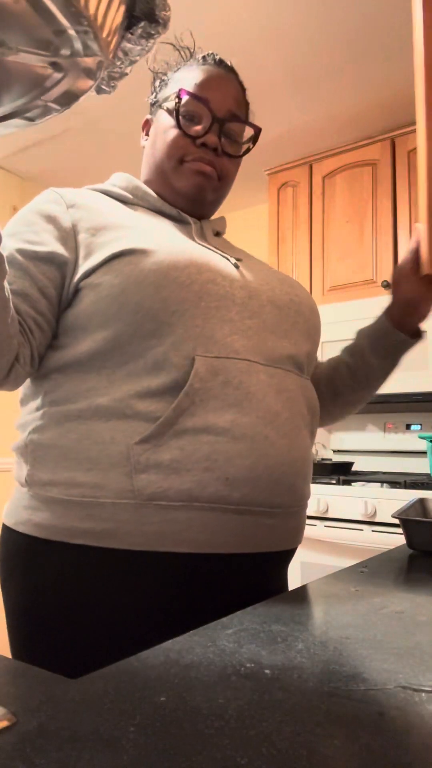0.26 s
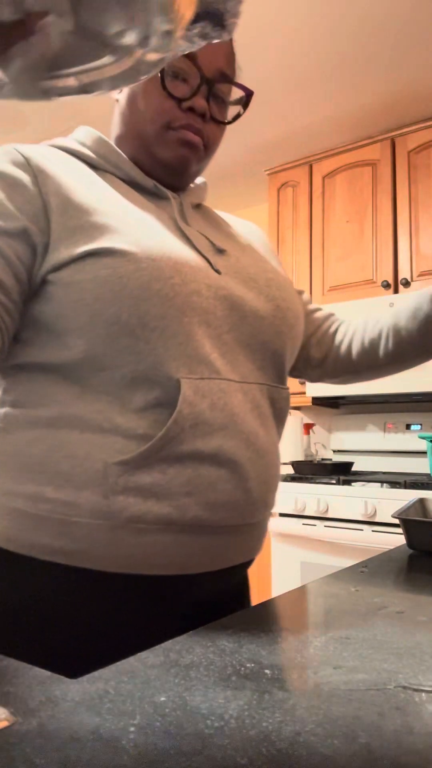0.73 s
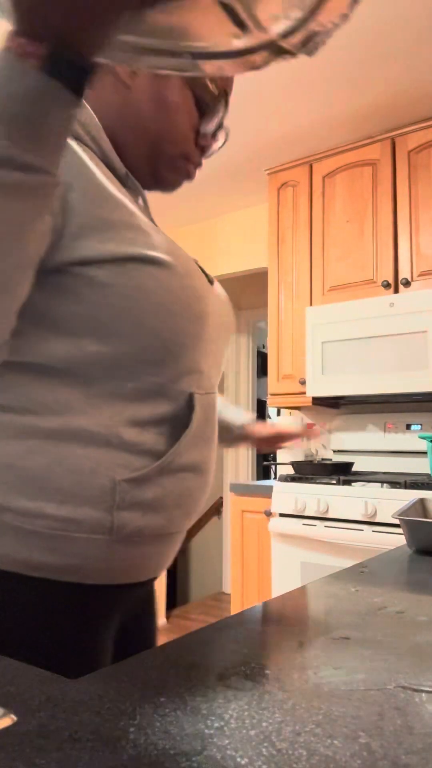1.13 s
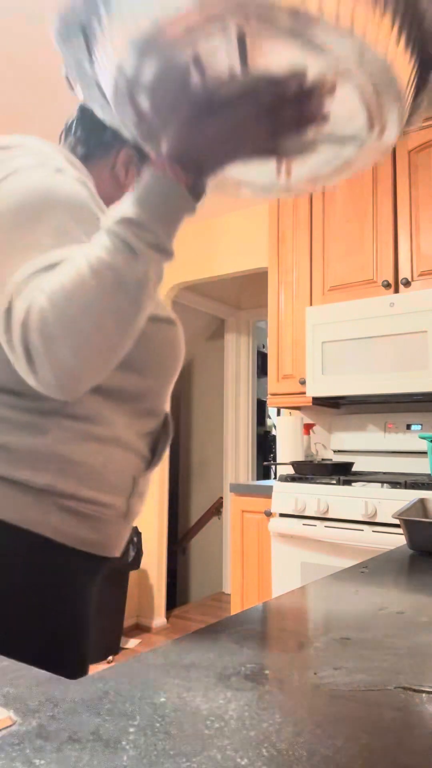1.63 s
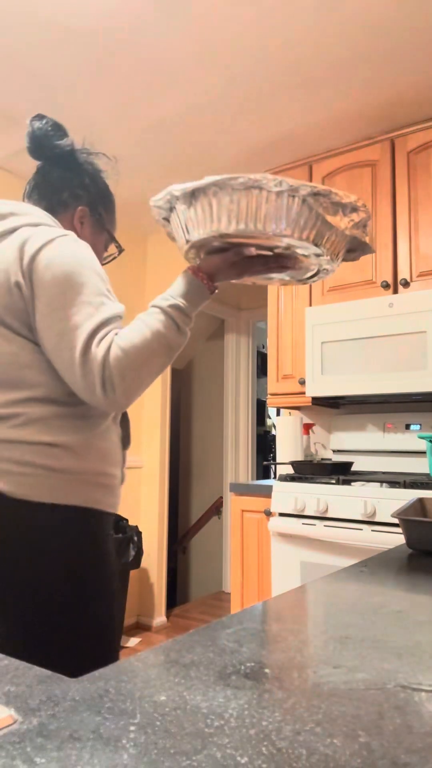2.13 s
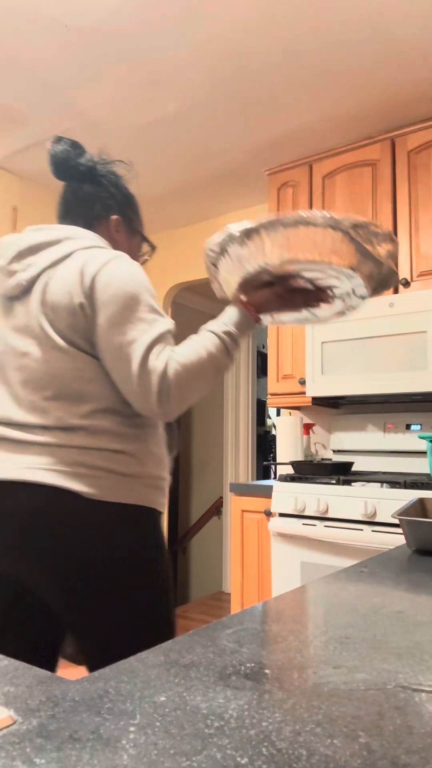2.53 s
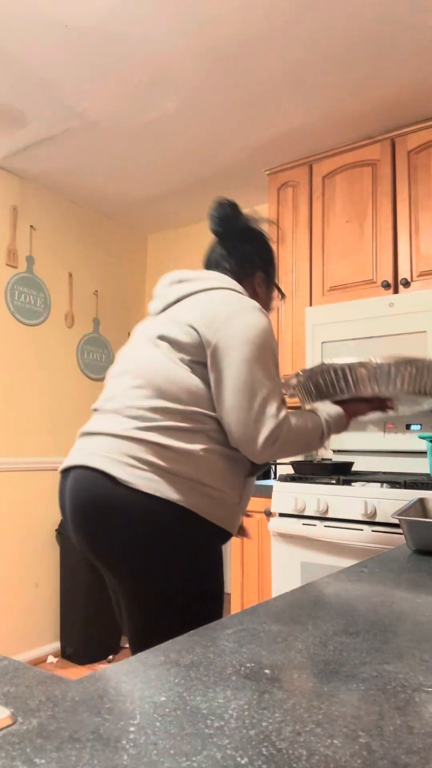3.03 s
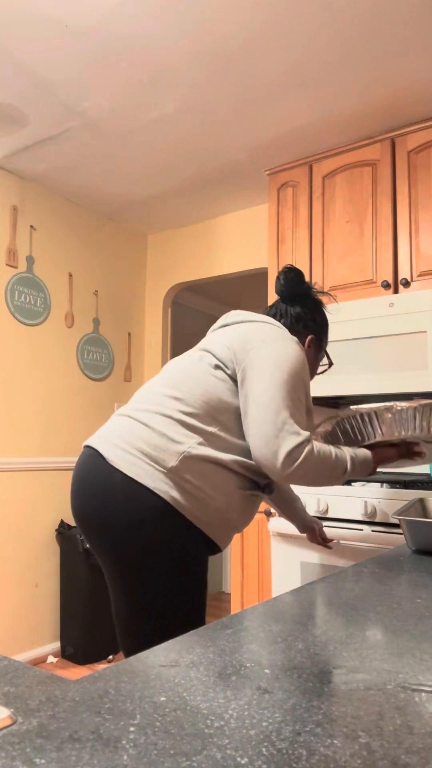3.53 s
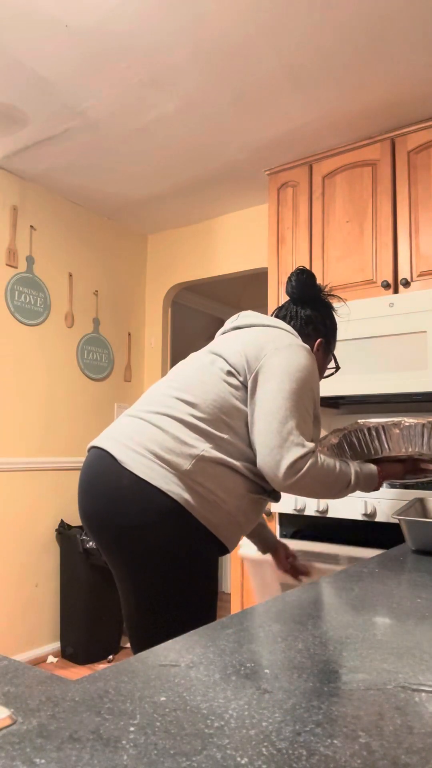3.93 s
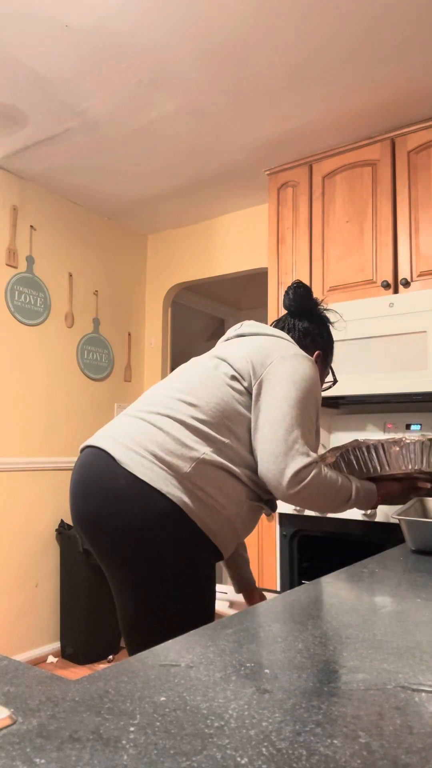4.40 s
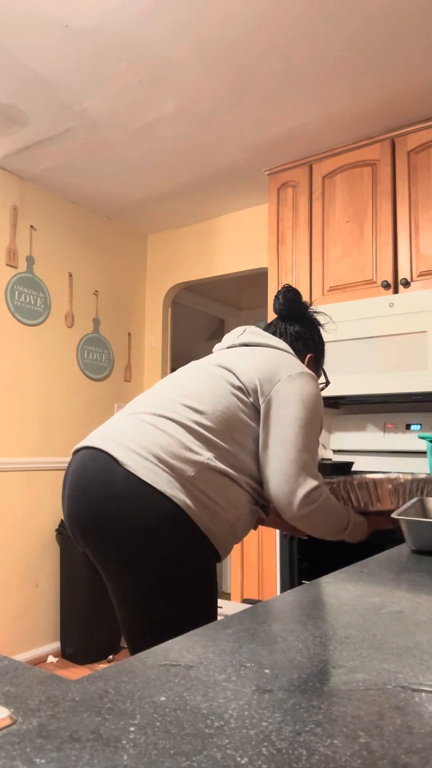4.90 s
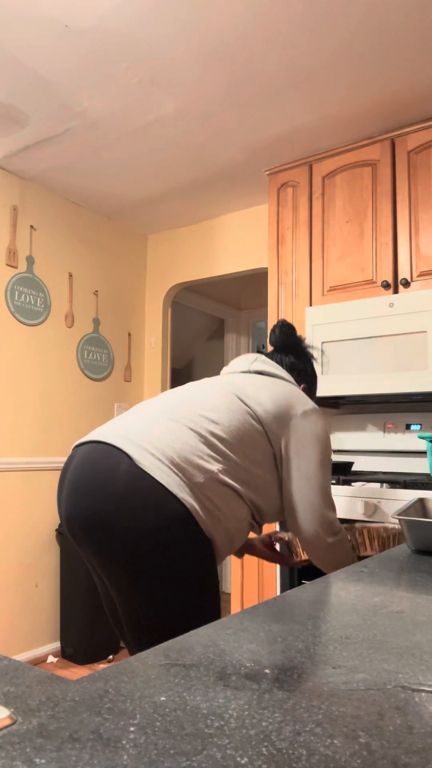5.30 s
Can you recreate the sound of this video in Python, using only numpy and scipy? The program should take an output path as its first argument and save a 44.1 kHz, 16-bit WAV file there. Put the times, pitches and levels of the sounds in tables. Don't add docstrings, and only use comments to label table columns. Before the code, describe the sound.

A small, hard-surfaced home kitchen heard by a stereo phone lying on the counter, with a soft, low refrigerator hum throughout. From 0 to 0.4 s, latch ticks, clicks and a light foil rustle; a thin, broken hinge creak peaks faintly near 0.85 s. At 1.1 s a wooden cupboard door slams very loudly, with a deep boom, sharp crack, rattling loose parts and thin crockery ringing. It bounces hard at 1.5 s, more softly at 1.8 s, and settles with a short rising groan and small knock at 2.1 s. Low, heavy steps thud through the floor from 1.3 to 4.2 s. At 3.0 s the oven door comes off its seal with a hollow, mid-low metallic clunk and brief foil crackle. Quiet rustles and tiny ticks continue until about 4.85 s, when a clink and bright foil crackle begin; the pan scrapes and ticks onto the rack until 5.6 s.

```python
import sys
import numpy as np
from scipy import signal
from scipy.fft import rfft, irfft, next_fast_len
from scipy.io import wavfile
from scipy.ndimage import uniform_filter1d

SR = 44100
rng = np.random.default_rng(int(sys.argv[2]) if len(sys.argv) > 2 else 0)


def how_loud(loudness_db):
    steps = np.asarray(loudness_db, float) / 20
    return 10 ** steps


def digitize_waveform(pressure):
    field = np.atleast_2d(pressure).T
    bounded = np.clip(field, -1, 1)
    quanta = np.round(bounded * 32767).astype(np.int16)
    wavfile.write(sys.argv[1], SR, quanta)


N = 244755


def colour(x, points):
    hz, db = np.transpose(points)
    size = next_fast_len(len(x))
    bins_hz = np.arange(size // 2 + 1) * SR / size
    gain = how_loud(np.interp(np.log(bins_hz + 1), np.log(hz), db))
    return irfft(rfft(x, size) * gain, size)[:len(x)]


def unit(x):
    return x / np.sqrt(np.mean(x ** 2))


def fade(t, t60):
    return np.exp(-np.log(1000) * t / t60)


def add(out, x, s, db):
    i = int(s * SR)
    scaled = x * how_loud(db) / np.abs(x).max()
    out[..., i:i + x.shape[-1]] += scaled[..., :N - i]


def walk(rate):
    k = int(SR / rate)
    held = np.repeat(rng.standard_normal(N // k + 1), k)
    return unit(uniform_filter1d(uniform_filter1d(held, k), k)[:N])


def curve(rows):
    s, *columns = np.transpose(rows)
    return [np.interp(np.arange(N) / SR, s, c, -120, -120) for c in columns]


def share(centres_hz, k):
    grid = np.geomspace(50, SR / 2, num=60)
    peak_at_k = np.arange(len(centres_hz)) == k
    power = np.interp(np.log(grid), np.log(centres_hz), peak_at_k)
    return np.transpose([grid, 10 * np.log10(power + 1e-5)])


def rings(modes, t, rough):
    phase = rng.uniform(0, 2 * np.pi, (len(modes), 2, 1))
    knots = np.arange(0, t[-1] + .03, .025)
    flutter = [np.interp(t, knots, v) for v in rng.standard_normal((len(modes), len(knots)))]
    total = 0
    for (hz, db, t60, span), p, f in zip(modes, phase, flutter):
        wobble = 1 + min(rough * hz / 300, rough) * f
        total = total + how_loud(db) * wobble * np.sin(2 * np.pi * hz * t + p) * fade(span, t60)
    return total


def kitchen():
    # f/Hz, level/dB per Hz
    air_spectrum = [(15, -29), (30, -1.5), (60, -19), (130, -3.5), (195, -12), (250, -6), (300, -18.5),
                    (360, -9), (600, -20), (840, -20.5), (1000, -29.5), (2400, -33.5), (6200, -52.5),
                    (12000, -51.5), (16000, -48.5)]
    # f/Hz, level/dB
    compressor = [(59.2, -46), (123.8, -53.5), (253.0, -56.5), (344.5, -66), (376.8, -66)]
    t = np.arange(N) / SR
    air = np.array([unit(colour(rng.standard_normal(N), air_spectrum)) for _ in range(2)]) * how_loud(-50.5)
    hum = 0
    for hz, db in compressor:
        level = np.sqrt(2) * how_loud(db + 2.64 * walk(11.0))
        hum = hum + level * np.sin(2 * np.pi * hz * (t + 0.0013 * walk(6.4)))
    return air + hum


def ticks():
    # t/s, peak level/dB, f/Hz,
    # t60/s, broad click under the ring/dB
    small_ticks = [(0.03, -41, 5600, 0.14, -28), (0.159, -48, 2030, 0.41, -4),
                   (0.1999, -29, 2100, 0.093, 1), (0.231, -26.5, 1345, 0.091, -39),
                   (0.319, -42, 1830, 0.098, -20), (0.3882, -38.5, 2455, 0.055, -14),
                   (0.7194, -39, 3090, 0.12, -47), (0.9692, -45, 2910, 0.073, -21),
                   (1.086, -36, 1516, 0.2, -8), (1.445, -50, 2280, 0.2, -20),
                   (1.7586, -47, 4140, 0.096, -34), (2.585, -48, 2650, 0.096, -31),
                   (2.6427, -39.5, 2964, 0.15, -43), (2.9297, -50.5, 5190, 0.12, -30),
                   (3.3084, -47, 2420, 0.15, -1), (3.4206, -46, 2500, 0.055, -12),
                   (3.5335, -52, 1510, 0.15, -15), (3.9457, -39.5, 2537, 0.15, -32),
                   (4.544, -49.5, 2500, 0.12, 3), (4.5968, -47, 2470, 0.28, -12),
                   (4.7765, -45.5, 4040, 0.14, -24), (4.8514, -32.5, 3060, 0.12, -8),
                   (5.047, -42, 2710, 0.29, 19), (5.2076, -39, 2420, 0.29, 8),
                   (0.1586, -47, 5430, 0.1, -7), (0.235, -29, 1150, 0.054, -32),
                      (0.387, -48, 1536, 0.17, -31), (0.7206, -42.5, 1330, 0.053, -19),
                      (2.148, -47, 650, 0.1, -7), (2.422, -48, 274, .1, -26), (2.585, -43, 866, 0.068, -18),
                      (2.6393, -49, 1370, 0.1, -25), (2.6394, -45, 2070, 0.11, -25),
                      (3.01, -31.5, 2410, 0.15, -24), (3.3037, -56, 5500, 0.17, -8),
                      (3.5236, -48, 2620, 0.12, -18), (3.7375, -55, 6200, 0.2, -18),
                      (3.9424, -43, 2070, 0.089, -27), (3.9425, -48, 1390, 0.091, -26),
                      (3.944, -46, 3080, 0.12, -30), (4.5984, -50, 5340, 0.22, -11),
                      (4.838, -39.5, 2990, 0.13, 6), (4.852, -32.5, 912, 0.18, -11)]
    out, t = np.zeros((2, N)), np.arange(int(.3 * SR)) / SR
    for s, db, hz, t60, click_db in small_ticks:
        band = [(hz / 5, click_db - 28.0), (hz / 1.16, click_db), (hz, 0),
                (hz * 1.28, click_db), (hz * 4, click_db - 15.0)]
        noise = np.array([unit(colour(rng.standard_normal(len(t)), band)) for _ in range(2)])
        tail = noise * (fade(t, t60) + 0.3 * fade(t, 0.21))
        struck = tail + rings([(hz, 0, 1.43 * t60, t)], t, 0.18)
        add(out, struck * np.minimum(t / 0.00083, 1), s - .001, db - 3.0)
    return out


def hands():
    # t/s, body level/dB, thin crackle level/dB, swell/s per 20 dB, dying/s per 20 dB
    cupboard_moves = [(0.032, -66, -68, .02, 0.27), (0.18, -68, -66, 0.042, 0.046),
                      (0.196, -51.5, -77, 0.0052, 0.18), (0.42, -75, -92, 0.018, 1),
                      (0.722, -68, -82.5, 0.026, 0.11), (1.053, -52, -47.5, 0.029, 0.034),
                      (1.109, -46.5, -86, 0.083, .01), (1.444, -66, -90, 0.0069, .03),
                      (1.509, -52, -97, 0.012, 0.012), (1.762, -71, -85, .03, 0.061),
                      (1.81, -76, -75, .012, 0.18), (2.076, -69.5, -96, 0.18, 0.09),
                      (2.149, -58, -73, 0.0044, 0.37), (2.235, -58.5, -59.5, 0.27, 0.33),
                      (2.646, -64.5, -78, 0.3, 0.041), (2.774, -55.5, -68, 0.12, 0.13)]
    # t/s, body level/dB, thin crackle level/dB, swell/s per 20 dB, dying/s per 20 dB
    loading_moves = [(3.018, -42, -68.5, 0.015, 0.055), (3.065, -45, -50, 0.036, 0.11),
                     (3.6, -62, -79, 0.54, 0.059), (3.76, -71, -80.5, 0.15, 0.12),
                     (3.96, -69, -90, 0.19, 0.066), (4.06, -65, -81, 0.11, 0.7),
                     (4.35, -67.5, -69, 0.026, 0.083), (4.55, -81, -68, .015, .08),
                     (4.6, -68, -72, .01, 0.17), (4.781, -62, -69, 0.029, 0.024),
                     (4.858, -44, -51, 0.025, 0.26), (5.055, -53.5, -61, .015, 0.16),
                     (5.222, -51.5, -56.5, 0.067, 0.17), (5.335, -76, -60.5, 0.023, 0.3),
                     (5.41, -79, -63, .01, .1), (5.44, -57.5, -74, .05, 0.19), (5.54, -57, -60, 0.097, .2)]
    t = np.arange(0, N / SR, .001)
    s, body_db, crackle_db, swell, dying = np.transpose(cupboard_moves + loading_moves)[..., None]

    def moves(db, dies):
        return how_loud(db - 20 * np.maximum((s - t) / swell, (t - s) / dies)).sum(axis=0)

    held = np.clip(np.minimum(t - 0.05, 4.2 - t) / 0.11, 0, 1)
    body = moves(body_db, dying) + held * how_loud(-74.5)
    crackle = moves(crackle_db, 0.73 * dying) + held * how_loud(-80.5)
    return [np.interp(np.arange(N) / SR, t, g) for g in (body, crackle)]


def crinkle(points, per_s, spread_db, smear):
    strength = how_loud(2 * spread_db * np.minimum(rng.exponential(size=N), 3.0))
    clicks = (rng.random(N) < per_s / SR) * strength
    decay = fade(np.arange(int(smear * SR)) / SR, smear / 2)
    puffs = np.sqrt(np.abs(signal.fftconvolve(clicks, decay)[:N]))
    return np.array([unit(colour(puffs * rng.standard_normal(N), points)) for _ in range(2)])


def rustle():
    # f/Hz, level/dB per Hz
    foil_body = [(300, -13.5), (600, -8), (900, -14), (1600, -17), (2400, -7), (3300, -14), (5300, -15),
                 (7000, -20), (9000, -46.5), (12000, -70)]
    # f/Hz, level/dB per Hz
    foil_crackle = [(5000, -38), (7500, 9.5), (10000, 1.5), (12500, 6), (15000, -1.5), (17000, 8)]
    sheets_hz = [600, 1100, 1800, 2600, 3800, 5500, 8000]
    patches = sum(crinkle(share(sheets_hz, k), 500, 2.4, .07) for k in range(len(sheets_hz)))
    body = unit(np.array([colour(v, foil_body) for v in patches]))
    top = crinkle(foil_crackle, 600, 1.9, .04)
    grip, crackle = hands()
    return how_loud(0.5) * grip * body + how_loud(3.5) * crackle * top


def knocks():
    # t/s, peak level/dB,
    # f/Hz, t60/s, rise/s
    short_knocks = [(1.0842, -37, 2244, 0.15, .001), (1.0853, -46, 1340, 0.12, .001),
                    (1.089, -28.5, 517, 0.2, 0.0052), (1.119, -14, 1534, 0.08, 0.0028),
                    (1.119, -11.5, 2175, 0.058, 0.0031), (1.121, -23, 3740, 0.047, .003),
                    (1.121, -18.5, 830, 0.12, 0.0034), (1.1205, -22, 4800, 0.056, 0.0016),
                    (1.142, -21, 2270, 0.04, 0.0018), (1.15, -26, 885, 0.41, .004),
                    (1.161, -18, 1956, 0.038, .001), (1.172, -27, 2450, 0.067, .001),
                    (1.184, -28.5, 1558, 0.11, 0.0015), (1.213, -31.5, 2530, 0.18, 0.0031),
                    (1.444, -45, 2275, 0.14, 0.00087), (1.446, -55, 3120, 0.055, .001),
                    (1.449, -43.5, 954, 0.12, 0.00089), (1.5164, -26.5, 1916, 0.09, 0.0013),
                    (1.5156, -23.5, 2330, 0.1, .001), (1.5174, -28.5, 4050, 0.056, 0.00095),
                    (1.526, -27, 3480, 0.074, 0.0017), (1.551, -28, 2600, 0.065, 0.00081),
                    (1.566, -29, 2200, 0.22, .003), (1.577, -35.5, 1876, 0.26, 0.0022),
                    (3.007, -25, 792, .08, 0.0026), (3.0096, -35, 2385, .07, .001),
                    (3.028, -18.5, 474, 0.069, 0.0056), (3.027, -33, 2354, 0.054, .002),
                    (3.044, -29, 640, 0.15, .002), (3.062, -37, 504, 0.059, 0.0024),
                    (0.033, -55, 5630, .12, .003), (4.86, -39, 2400, .15, 0.0043),
                    (4.94, -44, 2500, 0.11, .002), (5.056, -48, 5400, 0.12, .003),
                    (5.075, -51, 2180, 0.069, .003),
                    (1.826, -35.5, 2310, .06, 0.0023), (1.826, -44.5, 1484, .07, .002),
                     (1.828, -49, 4830, 0.035, .001), (1.846, -38, 2310, 0.055, .002),
                     (1.847, -41, 1540, 0.064, 0.0017), (1.862, -39, 2440, 0.07, .002),
                     (1.88, -41, 2340, .1, .002), (1.905, -50.5, 1900, 0.41, 0.0074),
                     (1.91, -55, 3480, 0.32, .008), (2.146, -44, 2910, 0.065, .002),
                     (2.146, -59, 4600, .05, 0.0018), (2.2, -44, 2800, 0.18, 0.0097),
                     (2.143, -32.5, 724, 0.18, 0.0014), (3.007, -19, 434, 0.13, 0.0018),
                     (3.018, -28, 465, 0.091, .002), (3.042, -21.5, 477, 0.071, .003),
                     (1.5156, -37, 3000, 0.054, .001), (1.516, -36, 5310, 0.061, .001),
                     (1.124, -14.5, 2610, 0.021, 0.0015)]
    out, t = np.zeros((2, N)), np.arange(int(.2 * SR)) / SR
    rows = short_knocks
    ports = np.array([[1], [.6]])
    for (s, db, hz, t60, rise), spread in zip(rows, rng.standard_normal((len(rows), 6))):
        neighbours = [(hz * np.exp(.13 * v), -7.0, 0.85 * t60, t) for v in spread]
        cluster = [(hz, 0, t60, t)] + neighbours
        onset = 1 - np.exp(-(t / rise) ** 2)
        add(out, rings(cluster, t, 0.21) * onset * ports, s - .001, db)
    return out


def squeak(rows, slips_hz, rough):
    hz, db = curve(rows)
    turn = np.exp(2j * np.pi * np.cumsum(hz) / SR)
    parts = [(turn * (1 + rough * (walk(slips_hz) + 1j * walk(slips_hz)))).real for _ in range(2)]
    return how_loud(db) * np.array(parts)


def hinge():
    # t/s, f/Hz, level/dB
    creak_path = [(0.34, 2500, -75), (0.52, 2500, -73), (0.565, 2500, -68), (0.68, 2460, -72),
                  (0.74, 2450, -74), (0.85, 2420, -57), (0.97, 2405, -77)]
    # t/s, f/Hz, level/dB
    groan_path = [(1.96, 400, -72), (2.05, 525, -52), (2.13, 538, -46)]
    breaks = how_loud(-4.5 + 2.1 * walk(34.8))
    return breaks * how_loud(5.0) * squeak(creak_path, 230, 1.24) + squeak(groan_path, 38, 0.64)


def blow(t, modes, contact, free):
    damped = 0.29 * np.minimum(t, free) + 0.99 * np.maximum(t - free, 0)
    choke = 1 - 0.52 / (1 + np.exp((free - t) / 0.0016))
    panel = rings([(*mode, damped if mode[0] < 300 else t) for mode in modes], t, 0.56)
    return panel * choke * (1 - np.exp(-t / contact))


def reverberant(t, points, lasts):
    # f/Hz, t60/s
    room_decay = [(150, 0.74), (500, 0.44), (1500, 0.29), (4000, 0.26), (12000, 0.36)]
    shaped = [colour(rng.standard_normal(len(t)), points) for _ in range(2)]
    hz, t60 = np.transpose(room_decay)
    age = 0.16 * np.minimum(t, lasts) + np.maximum(t - lasts, 0)
    return sum(np.array([colour(v, share(hz, k)) for v in shaped]) * fade(age, t60[k]) for k in range(len(hz)))


def clatter(t, tilt_db, lasts, top_db):
    # f/Hz, level/dB per Hz
    rattle_spectrum = [(90, 0.5), (160, -4), (300, -9), (500, -10.5), (870, -15), (1150, -19), (1550, -15),
                       (2300, -15.5), (3200, -20.5), (5000, -27), (7000, -39), (10500, -45), (16000, -48)]
    tilted = [(hz, db + tilt_db * np.log2(hz / 2000) + (top_db if hz > 9000 else 0))
              for hz, db in rattle_spectrum]
    crack = 1 + 0.18 * np.exp(-((t - .008) / 0.0022) ** 2)
    onset = 1 - np.exp(-(t / 0.0048) ** 2)
    return reverberant(t, tilted, lasts) * how_loud(1.83 * walk(100)[:len(t)]) * crack * onset


def crockery(t):
    # f/Hz, level/dB, t60/s
    cup_modes = [(1270, -4.5, .75), (1530, -3, .3), (1625, -5, .6), (1880, 0, .6), (1960, -5, .6),
                 (2350, -2, .45), (2560, -5, .65), (3150, -9, .35), (3500, -10, .5), (4370, -11, .55),
                 (4760, -12, .5), (5330, -11, .45), (6100, -15, .35)]
    shaken = [(hz, db + rng.standard_normal(), t60, t) for hz, db, t60 in cup_modes]
    twins = [(1.012 * hz, db - 4.0, 1.1 * t60, span) for hz, db, t60, span in shaken]
    return rings(shaken + twins, t, 0.6) * np.minimum(t / 0.0018, 1)


def doors():
    # t/s, peak level/dB, contact/s, free ring/s
    panel_blows = [
        (1.115, -0.5, 0.0059, 0.096),
        (1.508, -5, 0.024, 0.049),
        (1.816, -14, 0.014, 0.11),
        (2.139, -33.5, 0.00106, 0.031),
        (3.005, -15, 0.024, 0.048),
    ]
    # f/Hz, level/dB, t60/s
    slam_modes = [(53.8, -5.5, 0.74), (126.3, 2, 0.27), (172.8, -15.5, 0.51), (205.3, -13.5, 0.46),
                  (239.3, -14.5, 0.25), (310, -17.5, 0.41), (400, -25, 0.74), (454, -17, 0.82),
                  (525, -40, 0.32), (884, -32.5, 0.25), (718, -35, 0.086)]
    # f/Hz, level/dB, t60/s
    bounce_modes = [(53.3, -12.5, 0.29), (91, -2, 0.27), (125, -3.5, 0.25), (175.5, -11.5, 0.53),
                    (152.1, -8, 0.41), (258.8, -12.5, 0.31), (345, -11.5, 0.13), (418, -13.5, 0.26),
                    (524, -19, 0.2), (725, -28.5, 0.62)]
    # f/Hz, level/dB, t60/s
    rebound_modes = [(57, 1, 0.52), (101, -9.5, 0.58), (127.7, -6, 0.49), (150.4, -1, 0.1),
                     (212, -29, 0.18), (250, -39, 0.26), (402, -23.5, 0.35), (690, -35, 0.48)]
    # f/Hz, level/dB, t60/s
    settle_modes = [(233, -10, 0.19), (315, -17, 0.53), (380, -15, 0.84), (490, 7.5, 0.36), (603, -2, 0.33),
                    (715, 0, 0.66), (750, -3.5, 0.31), (860, -4.5, 0.26)]
    # f/Hz, level/dB, t60/s
    oven_modes = [(129.3, -16, 0.4), (162.4, -11.5, 0.15), (236, -12.5, 0.29), (327, -4, 0.24),
                  (395.6, -4, 0.2), (431, 0, 0.2), (480, -4, 0.2), (548.6, -9, 0.16), (630, -8, 0.16),
                  (772, -17, 0.067)]
    # t/s, peak level/dB, tilt/dB per octave, rattle/s, top air/dB
    loose_parts = [(1.1128, -12.5, 1.5, 0.065, 2), (1.513, -12, -1, 0.04, -2), (1.821, -26, -2, 0.047, 5.5),
                   (2.14, -25, -4.5, 0.019, -8), (3.005, -22.5, 0, 0.05, 9)]
    crockery_peaks = [-22.5, -31, -40, -76, -46]
    out, t = np.zeros((2, N)), np.arange(int(.8 * SR)) / SR
    bodies = (slam_modes, bounce_modes, rebound_modes, settle_modes, oven_modes)
    for (s, db, contact, free), modes in zip(panel_blows, bodies):
        add(out, blow(t, modes, contact, free), s, db)
    for (s, db, tilt_db, lasts, top_db), ring_db in zip(loose_parts, crockery_peaks):
        add(out, clatter(t, tilt_db, lasts, top_db), s, db)
        add(out, crockery(t), s, ring_db)
    return out


def steps():
    # t/s, peak level/dB, floor f/Hz, t60/s, roll-on/s
    footfalls = [(1.269, -17.5, 82.1, 0.48, 0.02), (1.445, -20, 79.6, 0.32, 0.027),
                 (1.594, -17, 53.8, 0.22, 0.014), (1.995, -31, 53.8, 0.23, 0.0075),
                 (2.198, -28.5, 53.8, 0.39, 0.021), (2.458, -34, 61.6, 0.54, 0.024),
                 (2.598, -21.5, 56.4, 0.35, 0.016), (2.737, -29.5, 63.5, 0.25, 0.0068),
                 (2.827, -27, 62.8, 0.2, 0.02), (2.849, -36, 126.3, 0.38, 0.03),
                 (3.029, -23.5, 56.5, 0.16, 0.039), (3.136, -26, 54.6, 0.15, 0.019),
                 (3.27, -34.5, 62, 0.44, 0.094), (3.549, -28, 60.9, 0.12, 0.068),
                 (3.728, -28.5, 56.1, 0.28, 0.097), (3.985, -28.5, 58.3, 0.28, 0.028),
                 (4.201, -28, 53.4, 0.52, 0.017), (5.501, -41.5, 122, .2, .02)]
    out, t = np.zeros((2, N)), np.arange(int(.5 * SR)) / SR
    phases = rng.uniform(0, 2 * np.pi, (len(footfalls), 2))
    for (s, db, hz, t60, roll), p in zip(footfalls, phases):
        overtone = 0.35 * np.sin(2 * np.pi * 2.5 * hz * t + p[1]) * fade(t, 0.29)
        ring = np.sin(2 * np.pi * hz * t + p[0]) + overtone
        add(out, ring * fade(t, t60) * (1 - np.exp(-(t / roll) ** 2)), s - .01, db - 3.0)
    return out


def scene():
    # f/Hz, level/dB
    sum_response = [(100, 0.5), (6300, 1.5), (7000, -6), (7600, -15.5), (8300, -18.5), (9200, -9),
                    (9800, -6.5), (10500, -1)]
    # f/Hz, level/dB
    difference_response = [(60, -42), (110, -68.5), (200, -23.5), (380, -15), (700, -1), (1300, -2.5),
                           (2400, -6.5), (4400, -4), (8000, -0.5), (11300, -5.5), (12200, -16),
                           (14300, -29.5), (15300, -4.5)]
    # f/Hz, level/dB
    right_lean = [(200, -82), (500, -43), (1000, -19), (2200, -11.5), (3300, -56.5)]
    shared, scattered = doors() + steps() + ticks() + rustle() + hinge() + kitchen() + knocks()
    mid = colour(shared, sum_response)
    side = colour(1.23 * scattered, difference_response) - colour(shared, right_lean)
    return np.array([mid + side, mid - side])


def top_cut(x):
    return signal.sosfilt(signal.butter(12, 16330, fs=SR, output="sos"), x)


def record(dry):
    no_rumble = signal.sosfilt(signal.butter(2, 38, "high", fs=SR, output="sos"), dry)
    rounded = np.tanh(0.57 * no_rumble) / 0.64
    mix = signal.sosfilt(signal.ellip(8, .2, 70, 15800, fs=SR, output="sos"), rounded)
    return top_cut(mix)


dry = scene()
out = record(dry)
digitize_waveform(out)
```